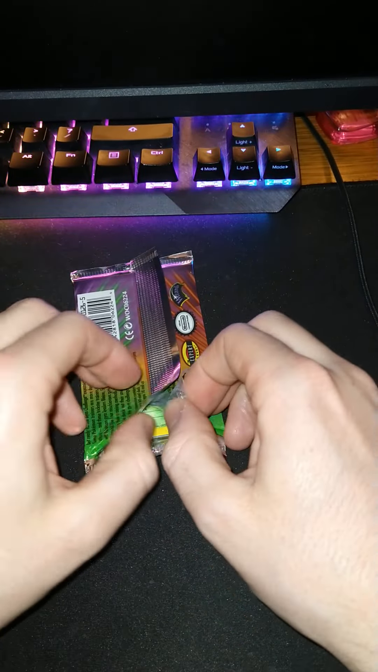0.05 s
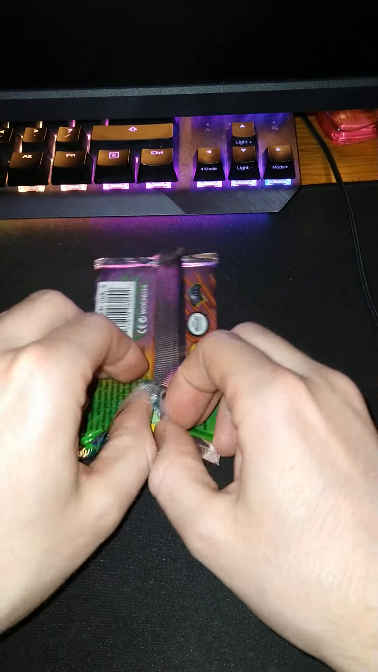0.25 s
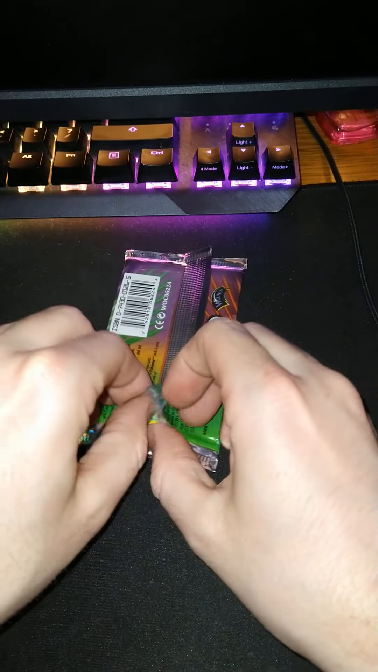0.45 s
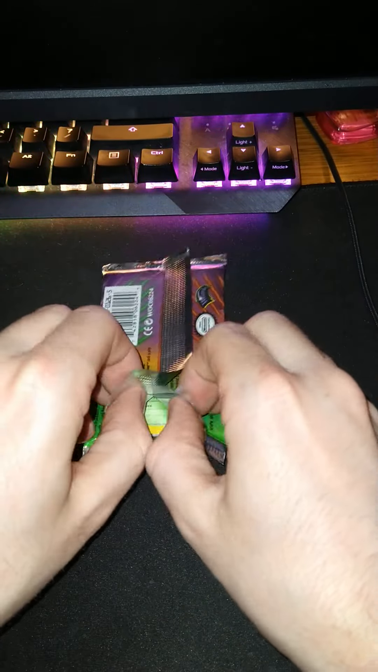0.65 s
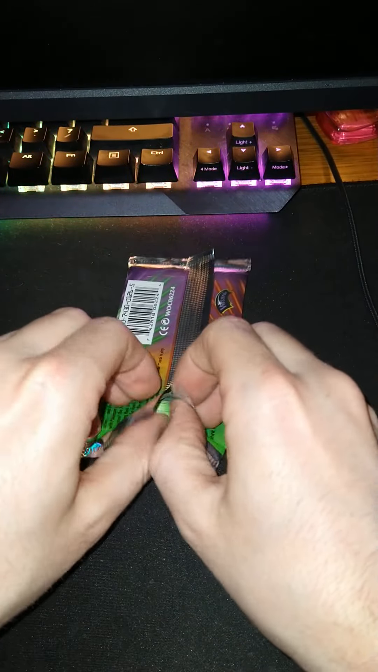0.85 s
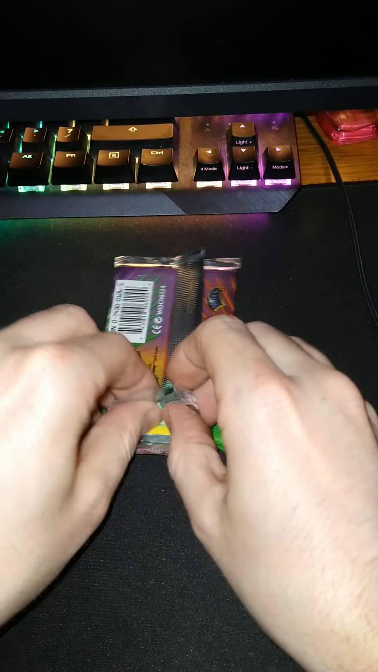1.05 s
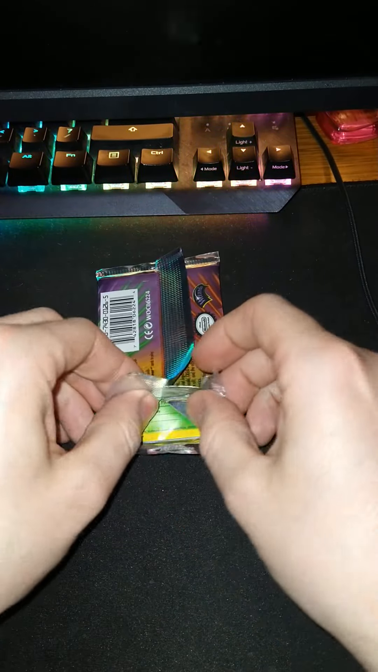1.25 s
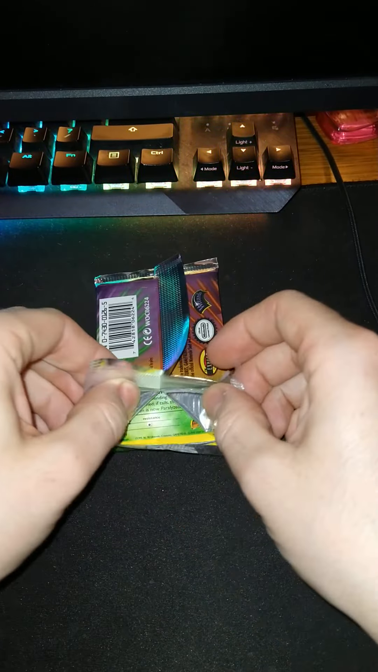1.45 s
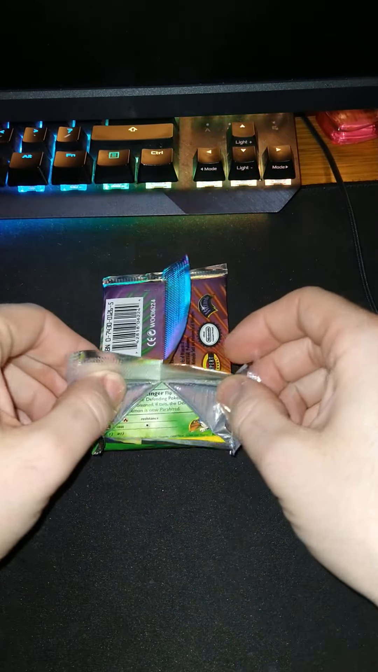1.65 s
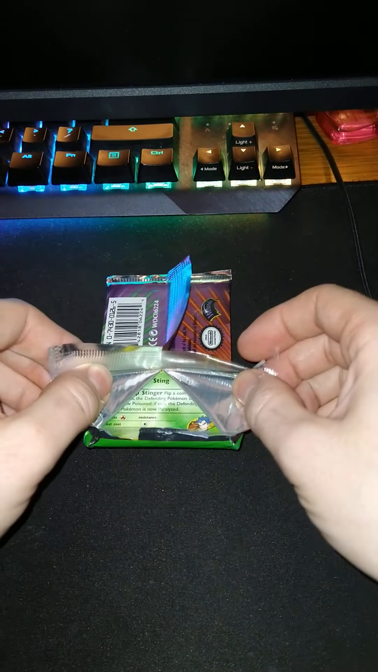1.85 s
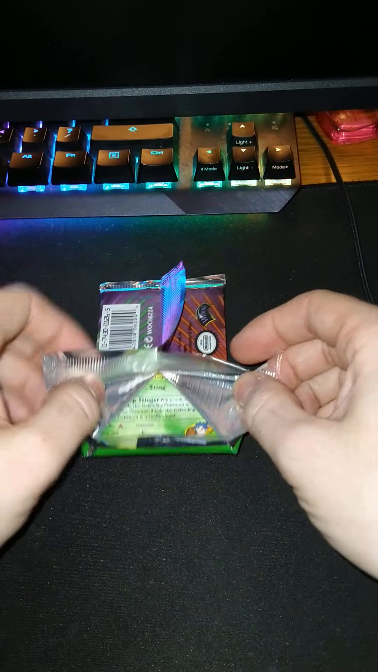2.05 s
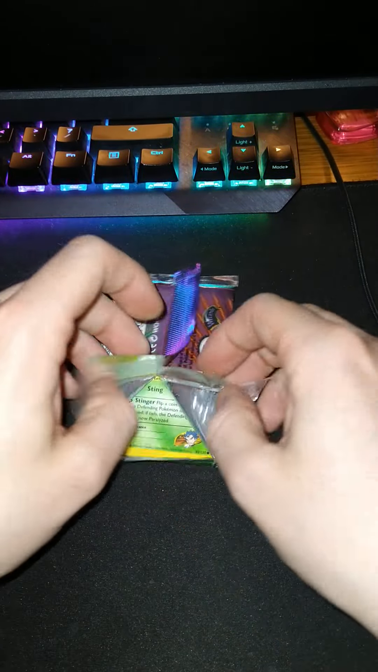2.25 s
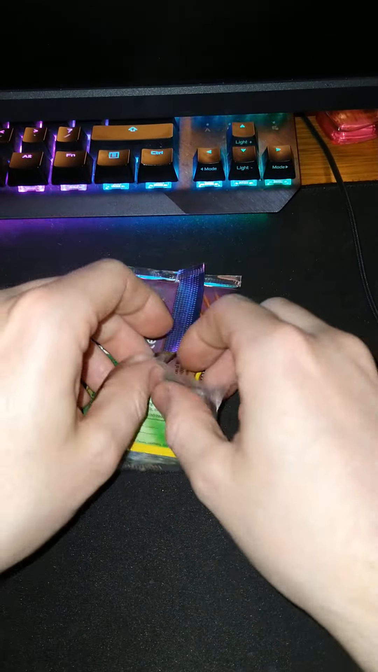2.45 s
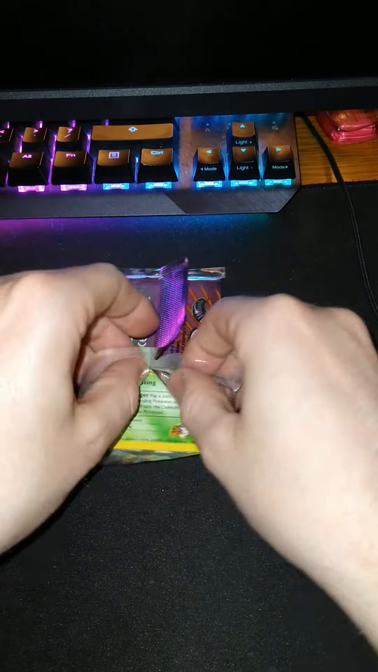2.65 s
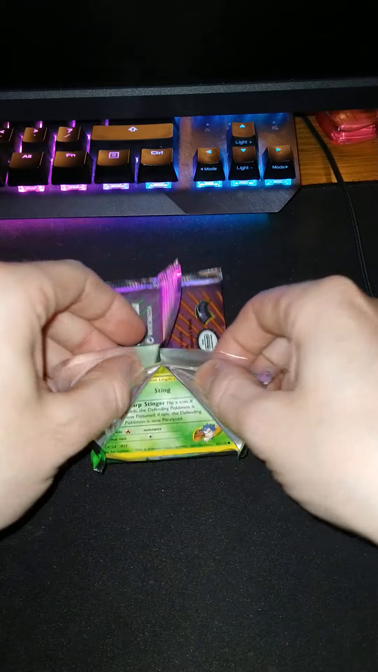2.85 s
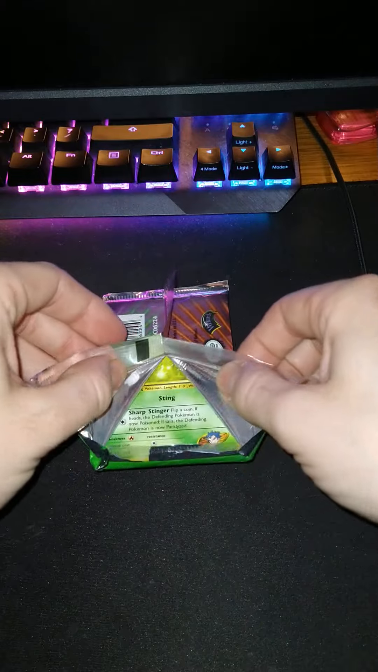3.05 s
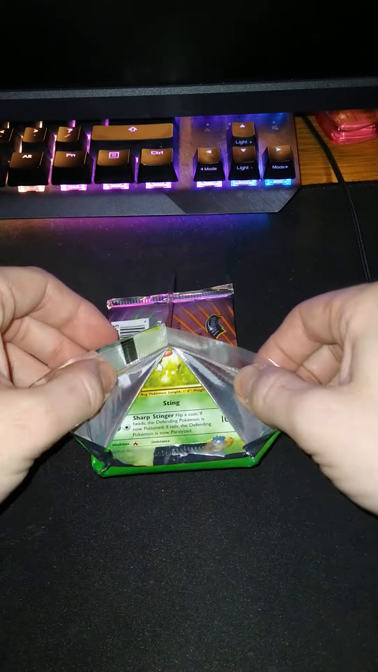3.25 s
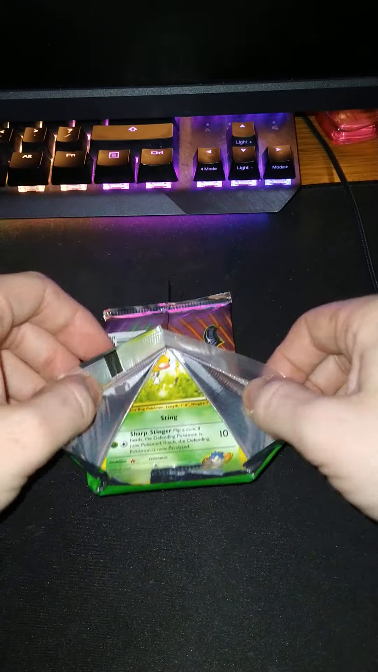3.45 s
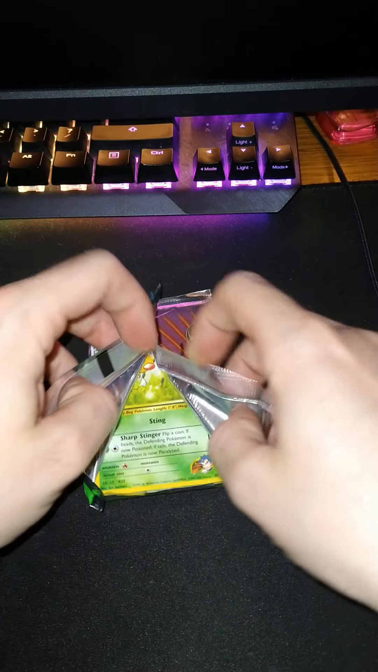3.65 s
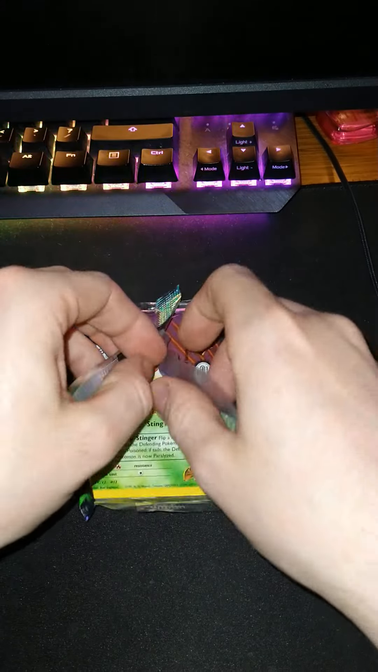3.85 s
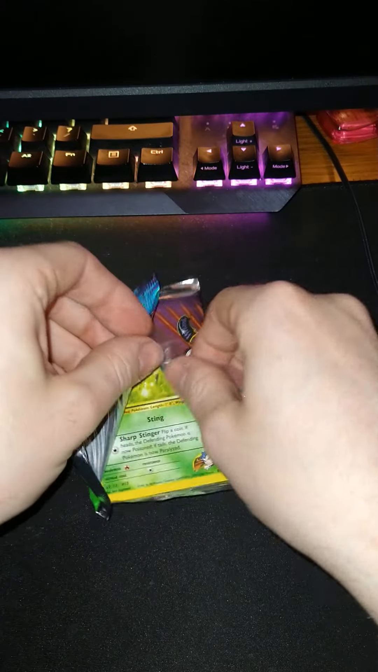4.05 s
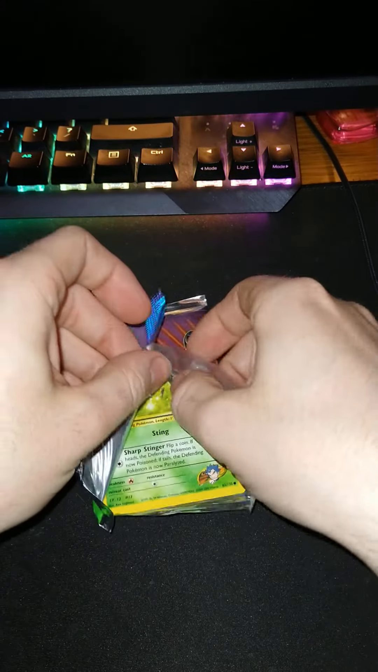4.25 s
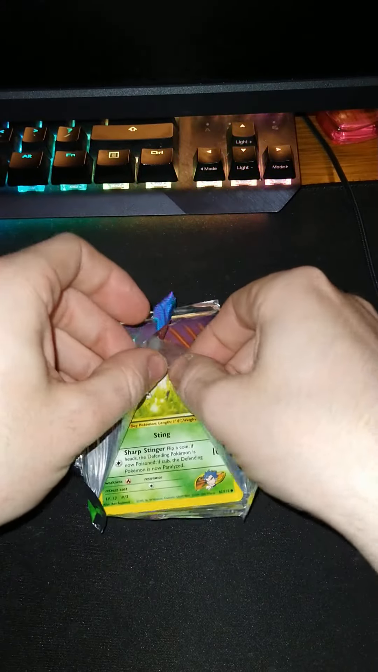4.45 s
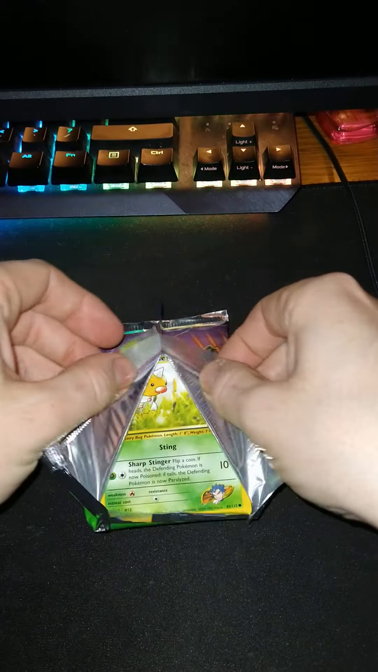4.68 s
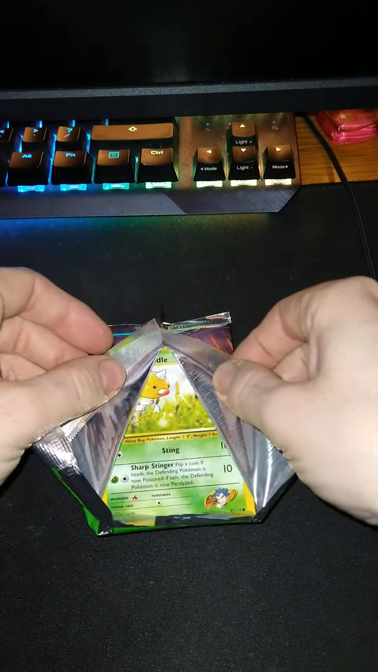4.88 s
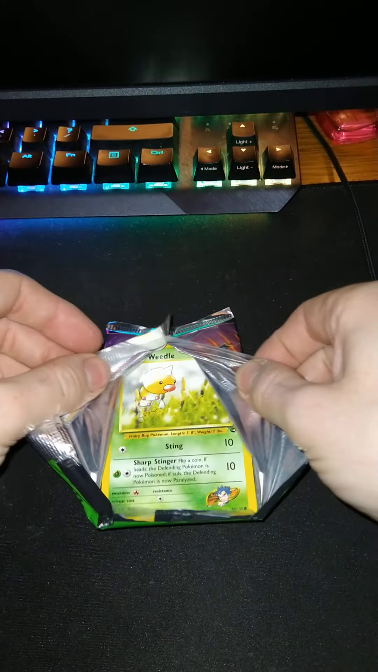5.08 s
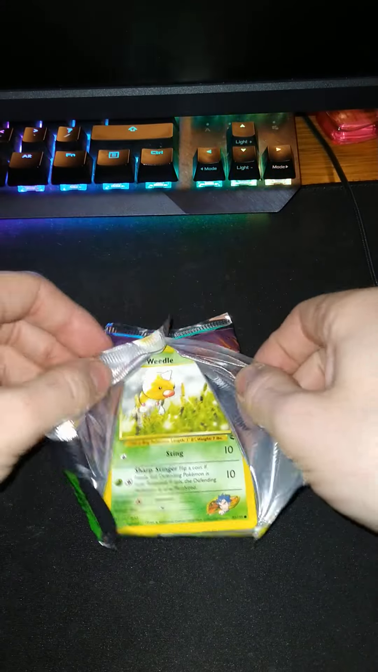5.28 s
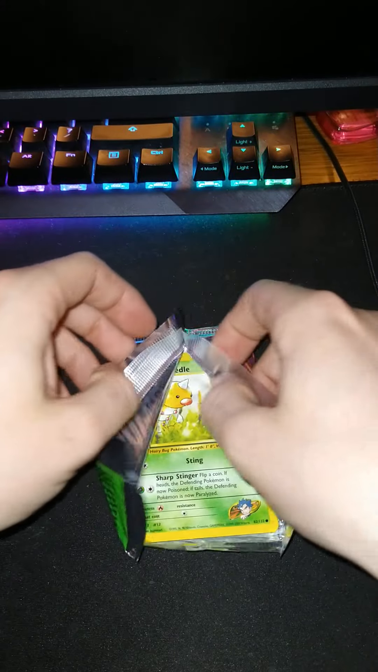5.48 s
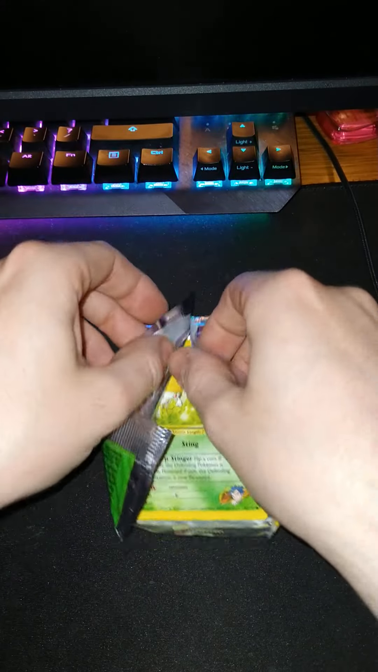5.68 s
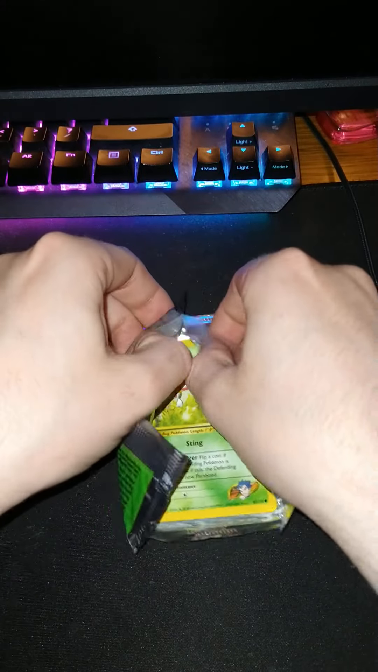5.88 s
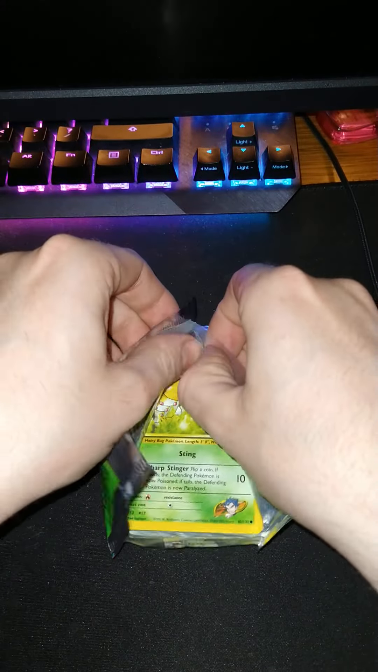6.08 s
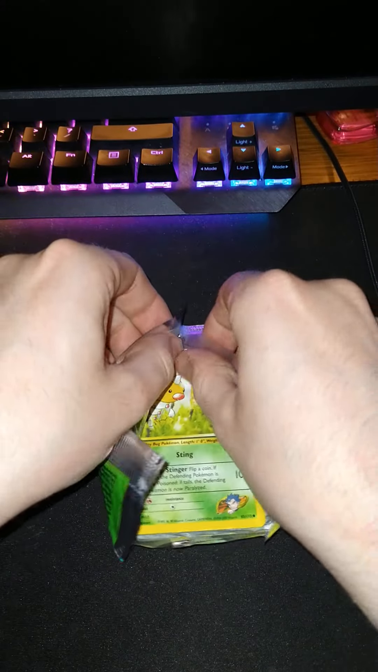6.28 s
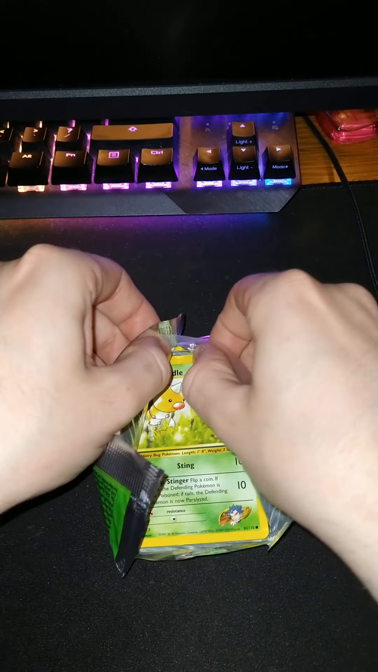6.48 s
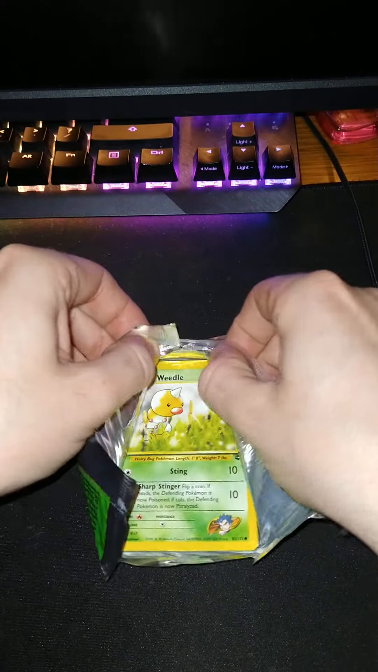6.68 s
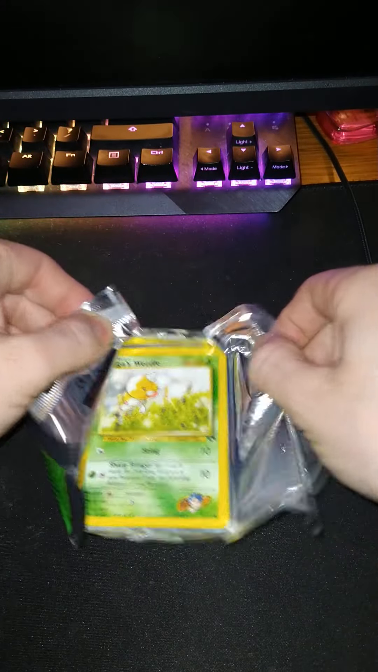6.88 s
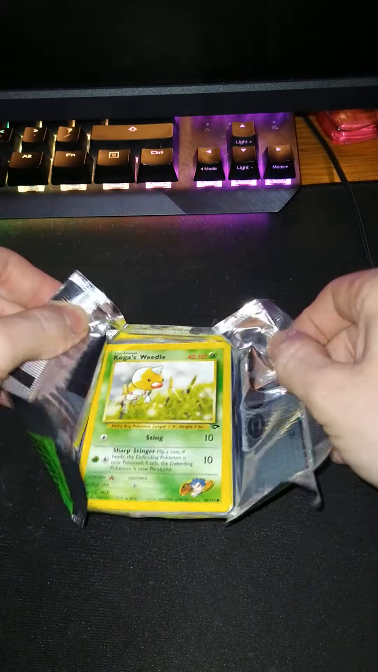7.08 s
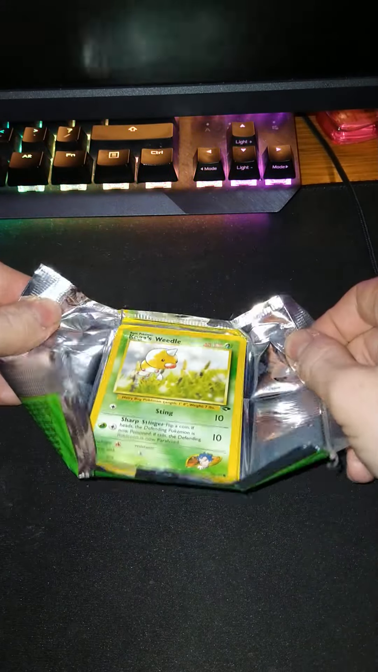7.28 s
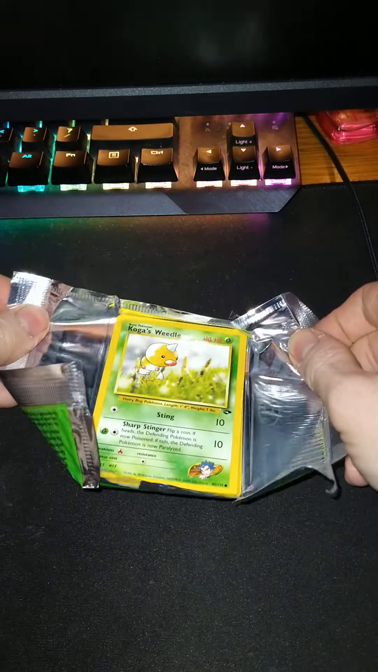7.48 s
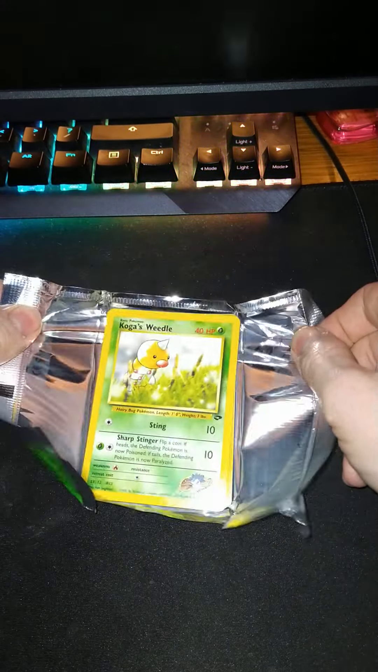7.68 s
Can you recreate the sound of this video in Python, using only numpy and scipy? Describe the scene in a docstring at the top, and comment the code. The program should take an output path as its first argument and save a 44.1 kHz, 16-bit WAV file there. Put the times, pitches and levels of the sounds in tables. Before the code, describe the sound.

A small foil packet is opened by hand, heard close in stereo in a small, quiet room with faint hiss and barely perceptible hum. From 0 to 1.4 s there are isolated dry snaps and light crinkles, with a stronger crumple near 1.0 s. A thin zip at 1.4 s leads into a crackling, rasping tear until about 2.0 s, followed by a tiny rip at 2.1. Sparse soft crumpling follows, until a brighter zip at 3.0 starts another half-second tear, dense with sharp snaps. From 3.6 to 4.7 s the film shifts and crinkles, with a sharp crumple near 4.2. Short rips come at 4.85 and 5.2, a hard snap at 5.5, then light scattered crackling. At 6.7 to 7.05 s several abrupt, louder tears arrive with hollow popping knocks. Bright crinkles and snaps, one popping at 7.3, continue to about 7.7 s.

```python
"""Isolated sharp snaps over faint hiss come first, as two hands peel open a foil card pack above a desk.
Buckling creases snap as short noise rings; each pull drives a train of tiny buckles, a rasp that coarsens.
Resonated noise sounds the hollow pouch and drumming walls; filtered noise sounds the rubbing fingers.
Seam strips zip and walls pop; a desk reflection, near echoes and a short tail place it in a small room."""
import sys
import numpy as np
from scipy import signal
from scipy.fft import rfft, irfft, next_fast_len
from scipy.io import wavfile
from scipy.ndimage import uniform_filter1d

SR = 44100
rng = np.random.default_rng(int(sys.argv[2]) if len(sys.argv) > 2 else 0)


def generate_wav(sig):
    """Save sig (samples, or channels by samples) to the path in sys.argv[1] as 16-bit PCM at SR."""
    pcm = np.round(np.clip(np.atleast_2d(sig).T, -1, 1) * 32767).astype(np.int16)
    wavfile.write(sys.argv[1], SR, pcm)


N = 340893  # samples
TIME = np.arange(N) / SR

# Pulls that open the seam: (start [s], end [s], build-up [s], relative crackle level [dB],
# swell over the pull [dB], body [dB], edge [dB], pouch resonance at start [Hz], at end [Hz],
# pouch against crackle [dB], walls against crackle [dB], fineness: relative number of ticks at the start)
PULLS = [(1.509, 2.026, 0.17, -31.5, -1.5, 4, 2.5, 521, 435.2, -20, -20, 1),
         (2.106, 2.122, 0.016, -37, -5.5, 0, 6, 446, 402, -14.5, -16, 1.03),
         (3.013, 3.54, 0.081, -32.5, -2.5, 8.5, 6.5, 597, 397, -20.5, -39, 1.6),
         (4.825, 4.902, .17, -27.5, -3.5, 10.5, 4, 945, 603.3, -28.5, -34, 5),
         (5.133, 5.259, 0.02, -37, 3, 10.5, 4, 486, 430, -17.5, -31, 1.02),
         (6.736, 6.839, 0.18, -34.5, 7, 10.5, 1.5, 624.7, 537, -18, -26, 2.5),
         (6.898, 6.932, 0.0297, -27.5, 6.5, 6, -9, 560, 560, -47, -25, 2.08),
         (7.013, 7.05, 0.061, -26.5, 2.5, 8.5, 1, 524, 514, -23, -32, 1.4)]
# Grip shifts that crumple the film: (middle time [s], half length [s], relative crackle level [dB])
GRIPS = [(0.636, 0.16, -57), (0.761, 0.025, -51.5), (0.844, 0.098, -55), (1.007, 0.04, -38.5),
         (1.106, 0.1, -49.5), (2.436, 0.16, -57.5), (2.549, 0.18, -49.5), (2.794, 0.029, -37.5),
         (2.884, 0.029, -44.5), (3.722, 0.13, -50.5), (3.911, 0.068, -52), (4.186, 0.08, -34.5),
         (4.35, 0.071, -46.5), (4.599, 0.039, -51), (4.981, 0.03, -39), (5.52, 0.057, -35.5),
         (5.71, 0.46, -54.5), (5.954, 0.021, -40.5), (6.057, 0.25, -47), (6.528, 0.084, -48),
         (7.166, 0.051, -43), (7.25, 0.055, -39), (7.327, 0.047, -33), (7.415, 0.025, -47.5),
         (7.652, 0.1, -51.5)]
# Colour of the fine crackle: (frequency [Hz], relative density [dB per Hz])
CRACKLE_COLOUR = [(50, -62), (170, -16.5), (450, -35), (850, -20.5), (1300, -10.5), (2050, -10),
                  (2600, -2.5), (3500, -3), (5000, -0.5), (6300, 0.5), (8300, 0.5), (11000, -7.5),
                  (15800, -11.5)]
# Creases that snap: (time [s], relative level [dB], body below 2.8 kHz [dB], edge above 9 kHz [dB]);
# body and edge are read against those of the usual snap
SNAPS = [(0.096, -17.5, -38, -35), (0.114, -25.5, -35, -25), (0.255, -19.5, -27.5, -17),
         (0.306, -24, -27, -19), (0.39, -21, -29.5, -13), (0.447, -27, -44, -17), (0.617, -20, -32, -54),
         (0.645, -29, -29, -39), (0.666, -17, -53, -31), (0.799, -24, -34, -30), (0.836, -17, -53, -10),
         (0.969, -21, -25, -14.5), (1.008, -12.5, -26, -37), (1.027, -21, -27, -18), (1.06, -15, -33, -10),
         (1.211, -12.5, -37, -25), (1.246, -18.5, -32, -17), (1.293, -14, -37, -11),
         (1.322, -19, -31.5, -9.5), (1.351, -23, -24, -14), (1.373, -17.5, -37, -15),
         (1.393, -17.5, -42.5, -13), (1.425, -21.5, -41, -22), (1.446, -9.5, -58, -14),
         (1.569, -15, -13.5, -22), (1.644, -8, -20, -22), (1.66, -8.5, -21, -27.5), (1.678, -8, -18.5, -12),
         (1.868, -11.5, -33, -9), (1.886, -11.5, -20, -10.5), (1.937, -8.5, -48, -11),
         (2.018, -6.5, -42, -3), (2.071, -18, -19, 0.5), (2.094, -19, -20, 5.5), (2.104, -29, -17, -11),
         (2.144, -21, -33, 4.5), (2.151, -19, -20, -1.5), (2.532, -25.5, -16, -8.5),
         (2.812, -16, -25.5, -36), (2.914, -15, -56, -25), (2.945, -12.5, -35, -24), (2.961, -9, -36, -29),
         (2.972, -11, -29.5, -10), (3.205, -8, -16.5, -1.5), (3.23, -7.5, -18, -10), (3.338, -25, -19, 6.5),
         (3.376, -13, -14, 2), (3.443, -13, -27, -1), (3.461, -14, -18, 3), (3.473, -13, -17, -5),
         (3.496, -13.5, -21, 2.5), (3.511, -8, -21, -10), (3.536, -19, -26, -8), (3.547, -14, -20.5, -1),
         (3.561, -14.5, -21.5, -5.5), (3.646, -23, -23, -22), (3.733, -18, -19.5, -16),
         (3.793, -29.5, -18, -10), (3.86, -25, -20, -10), (3.869, -18, -29.5, -38), (3.98, -18, -15, -10.5),
         (4.011, -25, -21.5, -10.5), (4.114, -22, -26, -19), (4.179, -10, -52, -5.5),
         (4.203, -12, -53, -18), (4.256, -10, -32, -6), (4.682, -18, -24.5, -24.5), (4.733, -14.5, -40, -3),
         (4.758, -10, -35, -9.5), (4.934, -6.5, -23, -5.5), (4.97, -15, -20, -2.5), (5.002, -24, -21, -5),
         (5.093, -17, -17.5, -9), (5.105, -17, -16, -3.5), (5.134, -10.5, -22.5, -19),
         (5.141, -16, -21, -2), (5.226, -7, -25, -15), (5.238, -9.5, -37, -12), (5.258, -21, -28, -30),
         (5.268, -14, -18.5, -30), (5.311, -25.5, -10, -7), (5.351, -13, -27, -19.5),
         (5.428, -23, -22, -33), (5.498, -5, -25.5, -6.5), (5.795, -17, -18, -15), (6.004, -20, -10, -22.5),
         (6.014, -15, -19, -17), (6.06, -15.5, -22, -13), (6.102, -15, -17, -15), (6.148, -29, -7, -27),
         (6.259, -33.5, -5.5, -18), (6.329, -28, -14.5, -4.5), (6.374, -23.5, -15, -15),
         (6.477, -25, -22, -9), (6.485, -18.5, -18.5, -31), (6.522, -17.5, -37.5, -2),
         (6.545, -26, -30, -1), (6.565, -14, -16, -13), (6.623, -30, -33, 0), (6.642, -21, -24, -5),
         (6.683, -25, -11.5, 4), (6.708, -16, -20, -6), (6.737, -17.5, -5, -4), (6.74, -6.5, -23, -9),
         (6.884, -7.5, -12.5, -10), (7.005, -10.5, -19, -16), (7.039, -9, -23, -15), (7.049, -3, -27.5, -7),
         (7.248, -12, -25, -11.5), (7.31, -7, -17.5, 0), (7.381, -18, -16.5, -5), (7.411, -7.5, -38, -14),
         (7.506, -24, -18.5, -5.5), (7.555, -30.5, -12, -4), (7.605, -7.5, -29.5, -14),
         (7.624, -15.5, -36, -12), (7.672, -18.5, -13.5, -19)]
# Colour of the usual snap: (frequency [Hz], relative density [dB per Hz])
SNAP_COLOUR = [(50, -5), (300, -15), (500, -7), (850, -5), (1300, -4.5), (2000, -3), (2700, -1.5),
               (4500, -4.5), (7000, 0.5), (8800, -6.5), (11000, -16.5), (15800, -24.5)]
# Smooth zips of the glued seam: (start [s], end [s], resonance of the taut strip [Hz], level [dB])
PEELS = [(1.42, 1.612, 5070, -40.5), (2.965, 3.054, 5460, -28.5), (7.147, 7.209, 7620, -35.5)]
# Walls of the pack that pop through: (time [s], pitch [Hz], level [dB])
POPS = [(6.7405, 970, -16.5), (6.884, 860, -27), (7.311, 1965, -15)]
# Colour of fingertips sliding on film: (frequency [Hz], relative density [dB per Hz])
RUB_COLOUR = [(200, -25.5), (1500, -13.5), (2800, -9.5), (4200, -10.5), (6800, -13), (14000, -22)]
# Echoes of desk, screen and walls: (delay [s], level [dB])
ECHOES = [(.0034, -42), (.0098, -20.5)]
# Decay of the room: (frequency [Hz], time to fall 60 dB [s])
ROOM_DECAY = [(200, 0.45), (1500, 0.16), (6000, 0.12), (15000, 0.096)]
# Colour of the quiet room: (frequency [Hz], relative density [dB per Hz])
ROOM_TONE = [(15, -22), (55, 4), (150, 6), (400, -2), (800, -11), (1500, -8), (5500, -7), (8000, -11),
             (15000, -17)]
# Faint hum: (frequency [Hz], level [dB])
HUM = [(140, -78), (240, -77)]

FADE_DB, RELEASE_S = 21, .055  # depth of a build-up or release; time in which a pull lets go
GRIP_BODY_DB, GRIP_EDGE_DB, GRIP_FINENESS = 8.5, -2, .9  # slack film
RESTING_DB = -66.5  # relative crackle level of film held still
OPENING_EDGE_DB, OPENING_WALLS_DB = 3.5, 11.5  # rise over a pull as it frees the film and walls
TAUT_BODY_DB, OPEN_S = -3.5, 0.12  # a pull starts thin, with the film taut; time to lose this
STRIP_HZ = (5400, 8000)  # ring of the strip at the start and end of a pull
COARSEN_S = .3  # time constant with which ticks grow fewer and larger as the seam runs
SNAP_RING_S = .00078  # time from onset to envelope peak, also its decay constant
FACET_RIPPLE_DB = 2.2  # rms unevenness of a facet's spectrum
FLUTTER_DB, FLUTTER_S = -24, .008  # faint slower decay after a ring
PORTS_ALIKE = .5  # correlation of a ring's noise between the two ports (0-1)
EDGE_HZ = 16150  # upper band limit


def hands(size=4000):
    """Energy addition: movements sum in power, and the strongest one weighs most in every colour."""
    t = np.linspace(0, N / SR, size)
    moves = [pull(t, *row) for row in PULLS] + [grip(t, *row) for row in GRIPS]
    power = [amp(move[0]) ** 2 + 1e-20 for move in moves]
    total = sum(power)
    level_db = 10 * np.log10(total + amp(RESTING_DB) ** 2)
    curves = [level_db]
    for column in list(zip(*moves))[1:]:
        curves.append(sum(p * value for p, value in zip(power, column)) / total)
    # level, body, edge, pouch pitch, pouch level, wall level, fineness, strip pitch
    return [np.interp(TIME, t, curve) for curve in curves]


def pull(t, start, end, build_up, db, swell_db, body_db, edge_db, first_hz, last_hz,
         pouch_db, walls_db, fineness):
    """Stored tension is released along the seam: the pouch opens, the rasp coarsens, the hands let go."""
    run = np.clip((t - start) / (end - start), 0, 1)
    taut = 1 - np.clip((t - start) / OPEN_S, 0, 1)
    slack = np.maximum(start - t, 0) / build_up + np.maximum(t - end, 0) / RELEASE_S
    level_db = db + swell_db * (run - .5) - FADE_DB * slack * np.maximum(slack, 1) ** 2
    pouch_hz = last_hz + (first_hz - last_hz) * (1 - run) ** 2
    return (level_db,
            body_db + TAUT_BODY_DB * taut,
            edge_db + OPENING_EDGE_DB * (run - .5),
            pouch_hz,
            pouch_db,
            walls_db + OPENING_WALLS_DB * (run - .5),
            fineness * np.exp(-run * (end - start) / COARSEN_S),
            np.interp(run, [0, 1], STRIP_HZ))


def grip(t, middle, half, db, pouch_hz=520, pouch_db=-24, walls_db=-20):
    """Crumpling of slack film follows the effort: it swells and fades symmetrically."""
    level_db = db - FADE_DB * ((t - middle) / half) ** 2
    return (level_db, GRIP_BODY_DB, GRIP_EDGE_DB, pouch_hz, pouch_db, walls_db,
            GRIP_FINENESS, np.mean(STRIP_HZ))


def jerks(uneven_db=1.56, size=400):
    """Stick-slip: the film catches and slips, so the crackle surges unevenly (dB)."""
    noise = rng.standard_normal(N)
    return uneven_db * evened(uniform_filter1d(uniform_filter1d(noise, size), size // 3))


def crackle(pull_db, body_db, edge_db, fineness, level_db=-2.0, ring=0.00058, per_s=900,
            thickening=0.96, size_db=2.5, facets_per_s=90):
    """Crackling noise: random buckles and breaking bonds merge into a rasp as the pull hardens."""
    # per_s holds at a pull of -32.5 dB and fineness 1
    rate = per_s * fineness * amp(thickening * (pull_db + 32.5))
    sizes = amp(size_db * np.minimum(rng.exponential(1, N), 4))
    kicks = (rng.random(N) < rate / SR) * sizes
    # the buckles of each moment share the energy that the hands put in
    power = uniform_filter1d(uniform_filter1d(kicks ** 2, size=1100), size=500)
    gain = amp(pull_db + level_db) / np.sqrt(abs(power) + 0.14 * rate / SR)
    kicks = kicks * gain * rng.choice([-1, 1], N)
    # stress travels across the film, so a few neighbouring facets sound at a time
    at = np.flatnonzero(kicks)
    facet = np.round(TIME * facets_per_s + rng.standard_normal(N))[at]
    out = np.zeros((2, N))
    for k in np.unique(facet):
        own = at[facet == k]
        train = np.bincount(own - own[0], kicks[own])
        ringing = signal.fftconvolve(train[None], buckle(CRACKLE_COLOUR, ring), axes=1)
        add(out, own[0] / SR, ringing)
    size = next_fast_len(N)
    spectrum = rfft(out, size)
    shares = zones(np.fft.rfftfreq(size, 1 / SR))
    body, middle, edge = (irfft(spectrum * share, size)[:, :N] for share in shares)
    return body * amp(body_db) + middle + edge * amp(edge_db)


def buckle(colour, ring, body_db=0, edge_db=0, size=1400, spread=0.00242, lag=.00006,
           lag_spread=.00003, order=34):
    """Snap-through of one crease: a dense dispersive ring and a faint flutter, heard at two ports."""
    t, hz = np.arange(size) / SR, np.fft.rfftfreq(2 * size, 1 / SR)
    fade = t / ring * np.exp(1 - t / ring) + amp(FLUTTER_DB) * np.exp(-t / FLUTTER_S)
    right, other = rfft(rng.standard_normal((2, size)) * fade, 2 * size)
    left = PORTS_ALIKE * right + np.sqrt(1 - PORTS_ALIKE ** 2) * other
    left = left * np.exp(-2j * np.pi * hz * rng.normal(lag, abs(lag_spread)))
    # every facet of the film has resonances of its own
    ripple = rng.standard_normal(len(hz))
    ripple = evened(uniform_filter1d(uniform_filter1d(ripple, order), order))
    response = (hz < EDGE_HZ) * amp(read(colour, hz) + FACET_RIPPLE_DB * ripple)
    z = np.array([evened(port * response) for port in (left, right)])
    body, middle, edge = zones(hz)
    z = z * (body * amp(body_db) + middle + edge * amp(edge_db))
    # bending waves run faster the higher they are, so the treble arrives first
    delay = spread / np.sqrt(1 + hz / 1000)
    return irfft(z * np.exp(-2j * np.pi * np.cumsum(delay) * hz[1]))[:, :size]


def strip(x, hz, ring_db=-4, width_hz=2400):
    """Resonance: crackle rings the film between the thumbs, at a pitch that climbs as each pull runs on."""
    return x + amp(ring_db) * np.array([resonate(port, hz, width_hz) for port in x])


def snaps(level_db=10, lead=.0004, usual_body_db=-17, usual_edge_db=-17):
    """Elastic instability of large creases, each coloured by its departure from the usual snap."""
    out = np.zeros((2, N))
    for s, db, body_db, edge_db in SNAPS:
        snap = buckle(SNAP_COLOUR, SNAP_RING_S, body_db - usual_body_db, edge_db - usual_edge_db)
        add(out, s - lead, amp(db + level_db) * snap)
    return out


def peel(width_hz=2000, bonds_per_s=5000):
    """Impulsive excitation: glue bonds part in a fast stream and ring the taut strip."""
    out = np.zeros((2, N))
    for start, stop, hz, db in PEELS:
        n = max(round((stop - start) * SR), 2)
        bonds = rng.standard_normal((2, n)) * (rng.random(n) < bonds_per_s / SR)
        pitch = np.full(n, hz)
        ringing = resonate(resonate(bonds, pitch, width_hz), pitch, width_hz)
        add(out, start, amp(db) * evened(ringing) * signal.windows.tukey(n, .5))
    return out


def pops(ring_s=.0022, overtone=1.928, overtone_db=-4, size=1200):
    """Snap-through of a whole wall: two damped modes knock, too small to radiate bass."""
    out, t = np.zeros((2, N)), np.arange(size) / SR
    for s, hz, db in POPS:
        modes = np.sin(2 * np.pi * hz * t)
        modes = modes + amp(overtone_db) * np.sin(2 * np.pi * hz * overtone * t)
        highpass = signal.butter(2, hz * .7, "high", fs=SR, output="sos")
        knock = signal.sosfilt(highpass, modes * np.exp(-t / ring_s))
        add(out, s, np.tile(amp(db) * knock, (2, 1)))
    return out


def pouch(pull_db, hz, db, width_hz=130, left_db=4, right_db=-10):
    """Cavity resonance: tearing rings the air in the pouch, which opens towards the left port."""
    hollow = resonate(rng.standard_normal(N), hz, width_hz)
    hollow = evened(resonate(hollow, hz, 2 * width_hz))
    return amp([[left_db], [right_db]]) * hollow * amp(pull_db + db)


def walls(level_db, ring_hz=770, width_hz=450):
    """Plate resonance: the broad walls drum under the tearing, one facing each port."""
    hz, drumming = np.full(N, ring_hz), []
    for wall in rng.standard_normal((2, N)):
        drumming.append(resonate(resonate(wall, hz, width_hz), hz, width_hz))
    return evened(np.array(drumming)) * amp(level_db)


def rub(pull_db, level_db=-7.0, most_db=-48, uneven_db=3):
    """Sliding friction hisses unevenly; under a hard pull the fingers grip, so it grows no louder."""
    slips = rng.standard_normal(N)
    slips = evened(uniform_filter1d(uniform_filter1d(slips, size=900), size=300))
    return coloured(RUB_COLOUR) * amp(np.minimum(pull_db, most_db) + level_db + uneven_db * slips)


def small(x, lowest_hz=260):
    """Radiation efficiency: a small sheet of film radiates hardly any bass."""
    return signal.sosfilt(signal.butter(2, lowest_hz, "high", fs=SR, output="sos"), x)


def desk(x, delay=0.0004834, bounce_db=-11, sway=0.097, size=9000):
    """Image-source interference: the desk mirrors the pack, and the comb drifts as the hands move."""
    drift = rng.standard_normal(N)
    drift = evened(uniform_filter1d(uniform_filter1d(drift, size), size))
    arrival = TIME - delay * (1 + sway * drift)
    return x + amp(bounce_db) * np.array([np.interp(arrival, TIME, port) for port in x])


def room(x, wet_db=-7.5, onset=0.00077, size=16384):
    """Reverberation: a few near echoes and a diffuse tail whose decay depends on frequency."""
    taps = rng.standard_normal((2, size)) * (rng.random((2, size)) < .15)
    taps = taps * (np.arange(size) > onset * SR)
    hz, t, z = signal.stft(taps, SR, nperseg=256)
    decay = amp(-60 * t / read(ROOM_DECAY, hz)[:, None])
    tail = signal.istft(z * decay, SR, nperseg=256)[1]
    tail *= amp(wet_db) / np.linalg.norm(tail[0])
    for delay, db in ECHOES:
        tail[[0, 1], round(delay * SR) + rng.integers(0, 10, 2)] += amp(db)
    return signal.oaconvolve(x, tail, axes=1)[:, :N]


def room_tone():
    """Stationary background: soft noise of fixed spectrum and a faint hum of pure tones."""
    hum = 0
    for hz, db in HUM:
        hum = hum + amp(db) * np.sqrt(2) * np.sin(2 * np.pi * (hz * TIME + rng.random()))
    return amp(-66.5) * coloured(ROOM_TONE) + hum


def amp(db):
    """Level law: decibels to amplitude ratio."""
    return 10 ** (np.asarray(db) / 20)


def evened(x):
    """Energy normalisation: scales to rms 1."""
    return x / np.sqrt(np.mean(abs(x) ** 2) + 1e-20)


def read(points, hz):
    """Logarithmic pitch scale: interpolates a table over log frequency."""
    f, value = np.transpose(points)
    return np.interp(np.log(hz + 1), np.log(f + 1), value)


def add(mix, s, sound):
    """Superposition: adds a stereo sound to the mix at time s."""
    part = mix[:, max(round(s * SR), 0):][:, :sound.shape[1]]
    part += sound[:, :part.shape[1]]


def zones(hz, body_hz=2800, edge_hz=9000):
    """Complementary filtering: shares of body, middle and edge that sum to 1."""
    body = 1 / (1 + (hz / body_hz) ** 6)
    edge = 1 - 1 / (1 + (hz / edge_hz) ** 8)
    return body, 1 - body - edge, edge


def resonate(x, hz, width):
    """Damped oscillator of unit peak gain, its natural frequency following the curve hz."""
    turn, r = np.exp(2j * np.pi * np.cumsum(hz) / SR), np.exp(-np.pi * width / SR)
    return 2 * (turn * signal.lfilter([1 - r], [1, -r], x / turn)).real


def coloured(colour):
    """Spectral shaping: smooth independent noise at both ports, rms 1."""
    size = next_fast_len(N)
    response = amp(read(colour, np.fft.rfftfreq(size, 1 / SR)))
    spectrum = rfft(rng.standard_normal((2, N)), size) * response
    return evened(irfft(spectrum, size)[:, :N])


def scene(left_db=0.52, right_db=1.5):
    """Source, path and background superpose; the pack lies a little nearer to the right port."""
    pull_db, body_db, edge_db, pouch_hz, pouch_db, walls_db, fineness, strip_hz = hands()
    jerky_db = pull_db + jerks() / np.maximum(fineness / 2, 1)  # finer ticks surge less
    tearing = strip(crackle(jerky_db, body_db, edge_db, fineness), strip_hz)
    film = desk(small(snaps() + tearing + peel())) * amp([[left_db], [right_db]])
    foil = film + pops() + pouch(jerky_db, pouch_hz, pouch_db)
    foil = foil + walls(jerky_db + walls_db) + rub(pull_db)
    return foil + room(foil) + room_tone()


def widen(x, lift_hz=760, width_hz=300, lift_db=5, mono_hz=300, narrowing=0.59):
    """Sum and difference: the pair lifts one narrow band of its difference and narrows the bass."""
    mid, side, hz = (x[0] + x[1]) / 2, (x[0] - x[1]) / 2, np.full(N, lift_hz)
    bass = signal.sosfiltfilt(signal.butter(2, mono_hz, fs=SR, output="sos"), side)
    lift = resonate(resonate(side, hz, width_hz), hz, width_hz)
    side = side - min(narrowing, 1) * bass + amp(lift_db) * lift
    return np.array([mid + side, mid - side])


def record(dry):
    """Linear pick-up: stereo widening, then a band limit."""
    lowpass = signal.firwin(511, EDGE_HZ, window=("kaiser", 9), fs=SR)
    return signal.oaconvolve(widen(dry), lowpass[None], "same")


dry = scene()
out = record(dry)
generate_wav(out)
```